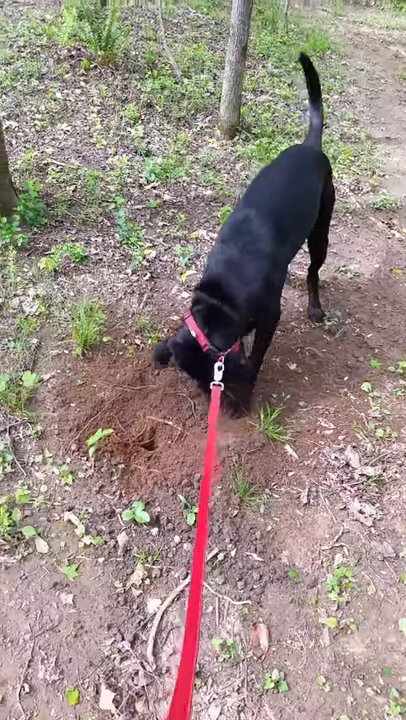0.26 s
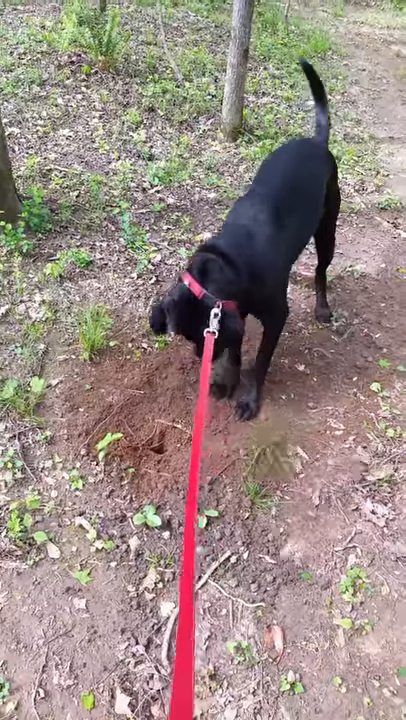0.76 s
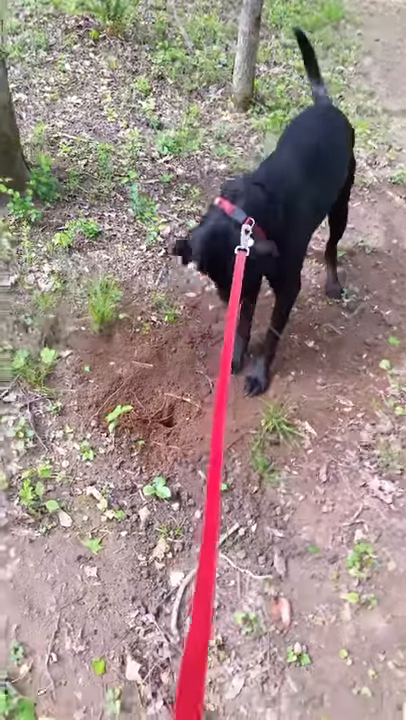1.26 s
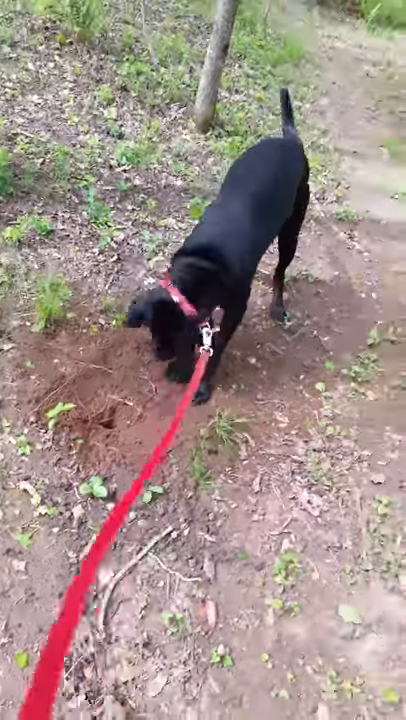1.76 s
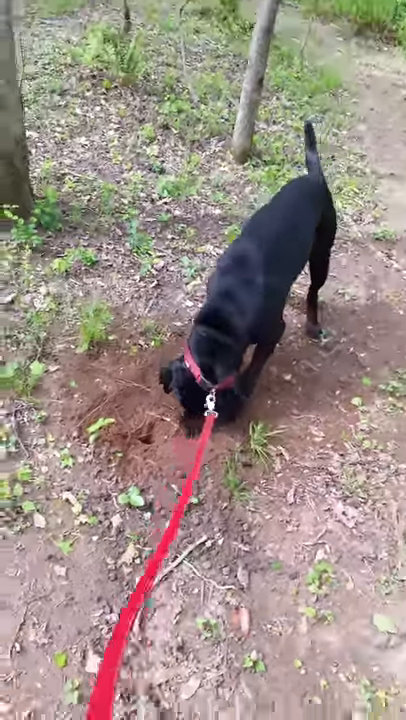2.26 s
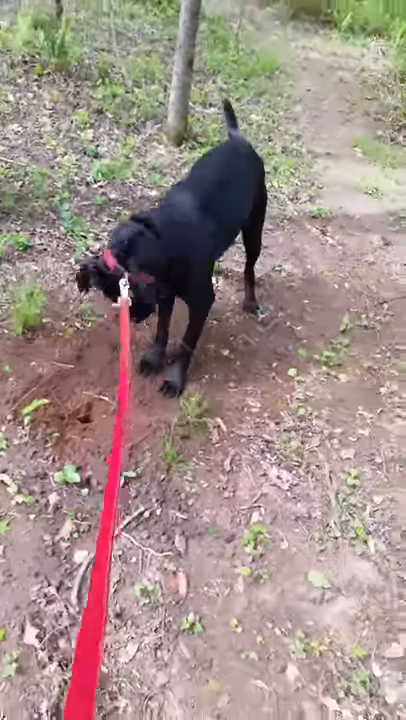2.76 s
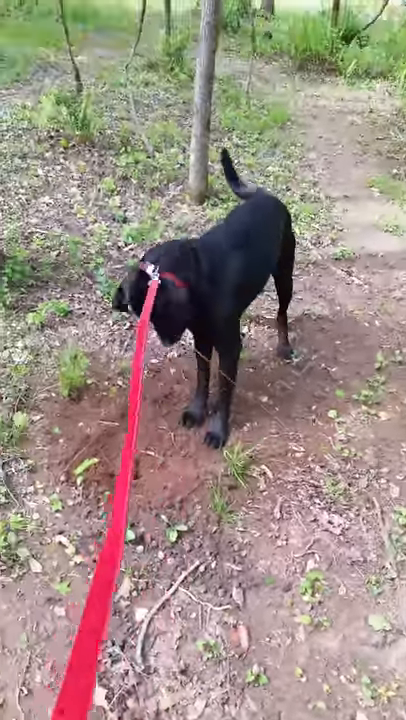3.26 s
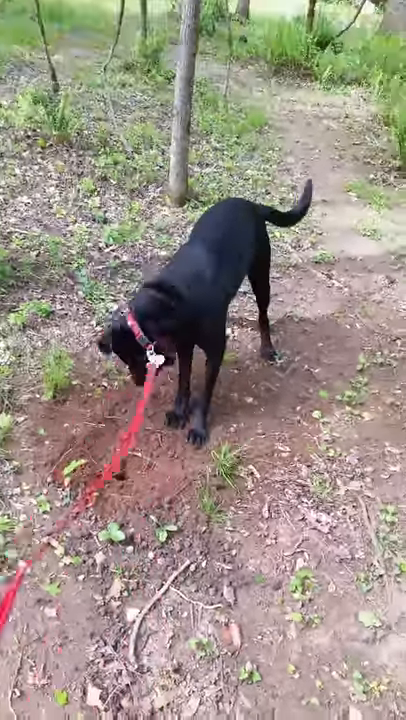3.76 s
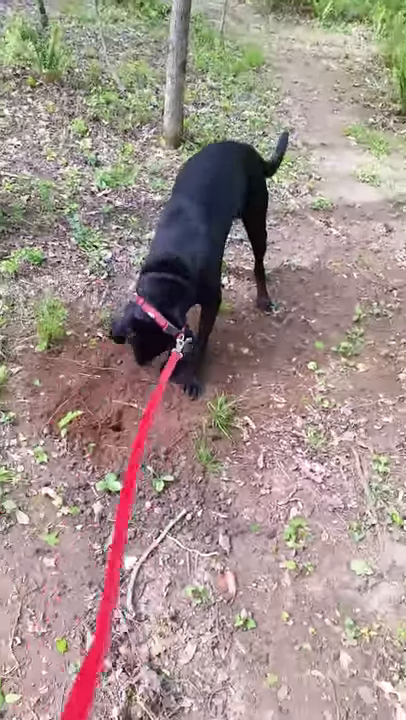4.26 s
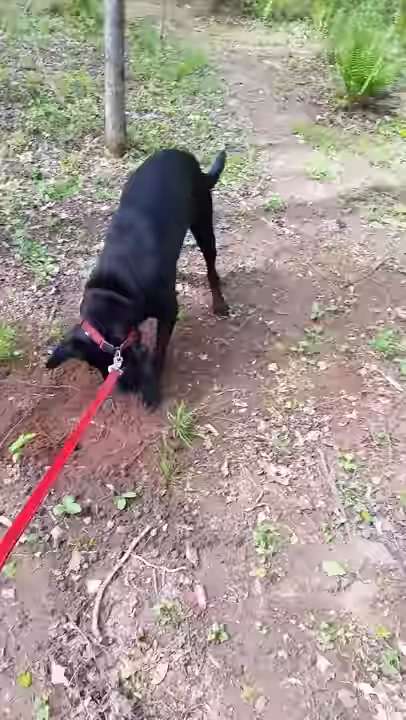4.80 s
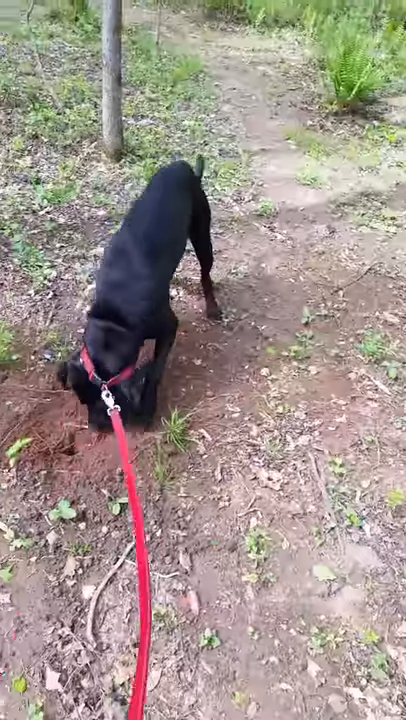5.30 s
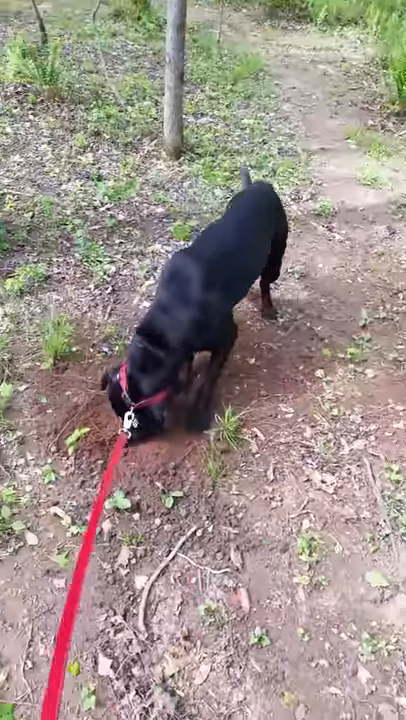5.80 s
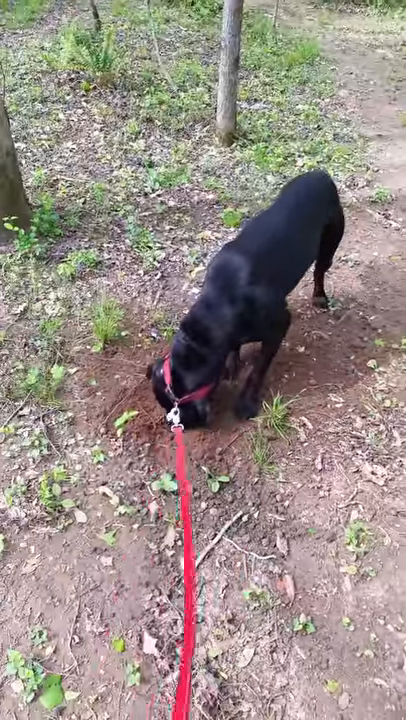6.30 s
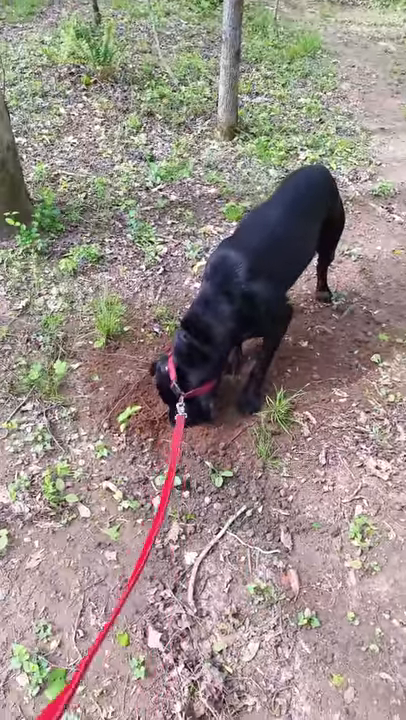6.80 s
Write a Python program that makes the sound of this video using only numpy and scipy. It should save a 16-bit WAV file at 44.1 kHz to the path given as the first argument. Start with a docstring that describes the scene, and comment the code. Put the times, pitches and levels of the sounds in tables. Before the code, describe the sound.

Faint outdoor hiss, a low rumble and a wavering hum run throughout on a woodland path. At about 0.5 seconds the microphone is softly bumped, and a dog starts pawing at dry soil. From 0.9 to 2 seconds its paws thud and scrape, grit hissing unevenly while clods and twigs snap sharply and a few pebbles tick. From 1.3 seconds the metal leash clip adds short, very high clinks. After a lull, a second bout of pawing comes between 3 and 4 seconds, with more thuds, crisp snaps and clinks, and a light rattle of the clasp. The scraping dies away by about 4.3 seconds. A few weak clinks follow until 5.3 seconds, then soft knocks near 5.6 and 6.7 seconds. A few very faint, brief whistles occur along the way, and the background carries on to the end at 7 seconds. The treble sounds brighter on the left.

```python
"""A leashed dog paws at dry soil on a woodland path. Faint hiss, a low rumble and a wavering hum sound
throughout, and the first of a few faint whistles follows. At 0.5 s the microphone is bumped; then paws thud,
grit scrapes by stick-slip friction, clods and twigs snap and pebbles tick. From 1.3 s the metal leash clip
rings in its modes; its clasp rattles in a second bout of pawing at 3-4 s. The scraping dies away, leaving a
few soft knocks. All is heard through two microphone ports, the left one resonating in the low treble."""
import sys
import numpy as np
from scipy import signal
from scipy.fft import rfft, irfft, next_fast_len
from scipy.io import wavfile
from scipy.ndimage import uniform_filter1d

SR = 44100
rng = np.random.default_rng(int(sys.argv[2]) if len(sys.argv) > 2 else 0)


def materialize(psi):
    """Save the field psi as 16-bit PCM at rate SR to the path in sys.argv[1].

    A 1-D psi becomes a single channel; in a 2-D psi each row is a channel.
    """
    bounded = np.clip(np.atleast_2d(psi).T, -1, 1)
    quanta = np.round(bounded * 32767).astype(np.int16)
    wavfile.write(sys.argv[1], SR, quanta)


N = 310816

# still air and far rumble: (frequency [Hz], spectral level [dB])
AIR_SPECTRUM = [(20, -27), (65, -11), (130, -13), (250, -25), (450, -31), (1080, -41), (2000, -52),
                (3300, -65), (3850, -53.5), (4600, -48.5), (5200, -60), (5800, -72.5), (7000, -78.5),
                (10000, -65), (15800, -52.5)]
# likeness of the air on the two sides: (frequency [Hz], correlation [1])
AIR_CORRELATION = [(60, 1), (240, 0.83), (950, 0.16), (3770, 0.01), (15000, 0.025)]
# swell of the rumble and of the hum: (time [s], level [dB])
RUMBLE_LEVEL = [(0.0, -57), (1.43, -49), (2.86, -53.5), (3.16, -47.5), (5.6, -57.5), (5.8, -68),
                (7.05, -58.5)]
HUM_LEVEL = [(0.0, -46), (0.53, -51), (0.61, -64), (1.71, -49.5), (3.59, -52), (4.91, -48), (5.16, -53.5),
             (5.38, -46.5), (7.05, -58)]
# colour of the rumble: (frequency [Hz], spectral level [dB])
RUMBLE_SPECTRUM = [(60, -2.5), (140, 3), (220, -4.5), (300, -1.5), (380, -14), (600, -16.5), (800, -20.5),
                   (1500, -36.5)]
# whistles: (time [s], duration [s], first pitch [Hz], target pitch [Hz], bandwidth [Hz], level [dB])
WHISTLE_GLIDES = [(0.243, 0.33, 2300, 2290, 320, -76.5), (1.466, 0.045, 874, 870, 120, -53),
                  (3.545, 0.085, 7200, 6800, 900, -62), (6.715, 0.3, 1232, 1580, 300, -76.5)]
# low thuds: a bump on the microphone at 0.5 s, then paws striking the ground:
# (time [s], level [dB], pitch [Hz])
LOW_THUDS = [(0.4955, -26.5, 125), (0.659, -38, 154), (0.9185, -19.5, 172), (0.9445, -21.5, 165),
             (1.254, -27.5, 268), (3.018, -26.5, 683), (3.053, -35.5, 730), (3.23, -22, 265),
             (3.245, -33, 563), (3.4875, -21.5, 543), (5.585, -38.5, 392), (5.764, -41, 253),
             (6.714, -43.5, 200)]
# clods and twigs breaking: (time [s], level [dB], relative level of the low part [dB])
LARGE_SNAPS = [(0.4968, -55, 5.5), (0.5161, -50.5, 5.5), (0.5681, -42.5, -2.5), (0.6639, -25.5, -12),
               (0.6754, -19.5, -20), (0.69, -32, -17), (0.9062, -15.5, -17), (0.9105, -16, -21),
               (0.9345, -22.5, -26), (1.037, -26.5, -17), (1.2532, -9.5, -20.5), (1.266, -18, -32),
               (1.3344, -23, -48), (1.3448, -21, -43.5), (1.3814, -18, -44.5), (1.4318, -27.5, -28),
               (1.4634, -24.5, -29), (1.7434, -26.5, -13), (1.749, -30, -11), (1.8208, -22.5, -32),
               (1.9084, -18, -39), (1.9665, -18.5, -35), (2.0672, -31.5, -26), (2.101, -27, -29.5),
               (2.3466, -37, -9), (2.4818, -45.5, -40), (3.0199, -39, 1.5), (3.0534, -39.5, -3.5),
               (3.2331, -17, -21), (3.2928, -30.5, -15), (3.3074, -20, -27), (3.3503, -31, -19.5),
               (3.4126, -28, -11), (3.473, -25, -28.5), (3.4905, -13.5, -14.5), (3.5085, -21, -24.5),
               (3.5144, -9, -27), (3.5339, -10.5, -27.5), (3.6065, -25.5, -30.5), (4.0941, -35, -45),
               (4.2642, -45, -18), (4.9072, -53.5, -11.5)]
# bright and low parts of a fracture: (frequency [Hz], gain [dB])
FRACTURE_BRIGHT = [(1500, -42), (2500, -31), (5000, -20.5), (9000, -6), (12000, 3), (15700, -7.5),
                   (16000, -39)]
FRACTURE_LOW = [(250, -8), (700, 4.5), (2000, 6), (4000, -3.5), (7000, -16.5), (10000, -49.5)]
# effort of the paws: (time [s], level [dB])
PAW_EFFORT = [(.5, -69), (.64, -61.5), (.88, -47.5), (1.08, -46), (1.45, -41.5), (1.78, -45.5),
              (1.88, -47.5), (2.0, -47.5), (2.13, -58), (2.3, -61.5), (2.72, -75), (2.77, -65.5),
              (3.08, -68), (3.2, -61), (3.4, -51), (3.62, -48), (4.15, -59), (4.3, -77.5), (6.3, -99)]
# fine grit and coarse crumbs: (frequency [Hz], gain [dB])
GRIT_SPECTRUM = [(1500, -55), (2200, -26), (3300, -8), (4300, -2), (7000, -3), (10000, 11), (14000, 10.5),
                 (15800, 10.5)]
SOIL_SPECTRUM = [(250, -6), (600, 0), (1200, -5.5), (2500, -6), (4000, -26.5), (6000, -37)]
# one band for each grain size, smaller grains higher: (frequency [Hz])
GRAIN_BANDS = [3034, 5280, 8370, 10700, 14670]
# pebbles knocking: (time [s], level [dB], pitch [Hz])
PEBBLE_TICKS = [(0.5267, -42.5, 2070), (1.5628, -36, 2940), (1.662, -43.5, 910), (3.772, -43.5, 980),
                (3.806, -48, 1250), (3.8375, -43, 4560), (4.845, -63.5, 4550), (5.2091, -58, 3890),
                (5.765, -60, 1005)]
# dry twigs and grit cracking: (time [s], level [dB])
TWIG_CRACKS = [(0.5515, -32), (0.9034, -13), (0.9184, 1.5), (0.9454, -3), (1.213, -13), (1.2638, -2),
               (1.4006, -13), (1.451, -12), (1.4893, -18), (1.628, -19), (1.6945, -25), (1.7095, -27),
               (1.8008, -27.5), (1.826, -21.5), (1.8412, -13), (1.863, -25.5), (2.0075, -30), (3.546, -13),
               (3.648, -26), (3.831, -34.5), (3.8383, -13.5), (3.868, -28), (3.912, -29.5), (4.351, -39),
               (4.683, -36)]
# blows on the leash clip, whose ring is short when it lies against the collar:
# (time [s], level [dB], relative level of the low modes [dB], T60 of the high modes [s])
CLIP_BLOWS = [(1.3234, -25, -30, 0.04), (1.345, -40, -30, 0.11), (1.3655, -33, -33, 0.04),
              (1.3743, -28, -35, 0.025), (1.6427, -28.5, -29, 0.035), (1.914, -21.5, -40, 0.073),
              (2.053, -57.5, 11.5, 0.03), (2.166, -38, -35, 0.022), (3.109, -32, -40, 0.014),
              (3.1268, -15.5, -34.5, 0.017), (3.152, -36, -32, 0.018), (3.1638, -21.5, -42, 0.018),
              (3.212, -44, -40, 0.019), (3.4224, -36, -30, 0.121), (3.452, -41, -17, 0.07),
              (3.4727, -34.5, -41.5, 0.027), (3.7112, -24.5, -45, 0.071), (3.751, -34.5, -20, 0.05),
              (3.85, -42.5, -18, 0.043), (4.0472, -36.5, -12, 0.045), (4.12, -43, -25, .03),
              (4.1348, -36.5, -31, 0.036), (4.695, -37.5, -36, 0.037), (5.1033, -50, -36, 0.068),
              (5.2884, -49.5, -48, 0.04)]
# high modes of the leash clip: (frequency [Hz], level [dB])
CLIP_HIGH_MODES = [(11760, 8), (11100, -11), (12250, -8), (11870, -7)]
# its low modes: (frequency [Hz], level [dB], T60 [s])
CLIP_LOW_MODES = [(8244, 4.5, 0.12), (7410, -2, 0.04)]
# touches of the clasp spring: (time [s], level [dB])
CLASP_TOUCHES = [(3.1083, -51), (3.1264, -49), (3.1595, -51), (3.172, -52.5), (3.3588, -54), (3.429, -58),
                 (3.445, -56), (3.5982, -52), (3.6093, -48), (3.717, -53)]
# modes of the clasp: (frequency [Hz], level [dB])
CLASP_MODES = [(2790, 2.5), (3130, 4), (3400, -2.5)]
# response of the left port relative to the right: (frequency [Hz], gain [dB])
PORT_RESPONSE = [(60, -2.5), (300, -2.5), (700, 0), (2600, 0), (3600, 9), (6000, 13), (7600, 9), (9200, 0),
                 (10500, -4), (15000, -2)]


def amp(db):
    return 10 ** (np.asarray(db) / 20)


def unit_rms(x):
    return x / np.sqrt(np.mean(x ** 2) + 1e-20)


def at_frequency(points, hz):
    """Interpolation of (frequency, value) points on a logarithmic frequency axis."""
    f, value = np.transpose(points)
    return np.interp(np.log(hz + 1), np.log(f + 1), value)


def contour(points):
    """Linear interpolation of (time, value) points at every sample."""
    return np.interp(np.arange(N) / SR, *np.transpose(points))


def colour(x, points):
    """Zero-phase filtering by (frequency, gain) points, silent outside their range."""
    size = next_fast_len(x.shape[-1])
    hz = np.fft.rfftfreq(size, 1 / SR)
    inside = (hz > points[0][0]) & (hz < points[-1][0])
    return irfft(rfft(x, size) * amp(at_frequency(points, hz)) * inside, size)[..., :x.shape[-1]]


def place(mix, start, sound, port_lag_s=0.00016):
    """Path difference: a sound reaches one port slightly before the other."""
    lags = port_lag_s * np.array([2 * rng.random(), 1])
    for side, lag, wave in zip(mix, lags, sound * np.ones((2, 1))):
        part = side[round((start + lag) * SR):][:len(wave)]
        part += wave[:len(part)]


def noise_pair(length, correlation):
    """Partial coherence: two white noises share a common part."""
    a, b = rng.standard_normal((2, length))
    return np.array([a, correlation * a + np.sqrt(1 - correlation ** 2) * b])


def air(patch_db=1.2, fade_from_s=4.6, fade_db_per_s=-2):
    """Diffuse noise, coherent in the bass; it drifts in patches below 3 kHz and fades late above."""
    frames, hz = N // 512 + 5, np.fft.rfftfreq(2048, 1 / SR)[:, None]
    a, b, c, d, patches = rng.standard_normal((frames, 1025, 5)).T
    patches = unit_rms(uniform_filter1d(uniform_filter1d(patches, 20, axis=0), 8, axis=1))
    correlation = at_frequency(AIR_CORRELATION, hz)
    left = a + 1j * b
    right = correlation * left + np.sqrt(1 - correlation ** 2) * (c + 1j * d)
    fade_db = fade_db_per_s * np.maximum(np.arange(frames) * 512 / SR - fade_from_s, 0)
    level_db = at_frequency(AIR_SPECTRUM, hz) + np.where(hz < 3000, patch_db * patches, fade_db)
    spectra = np.array([left, right]) * amp(level_db) * (hz < AIR_SPECTRUM[-1][0])
    return amp(-52.5) * unit_rms(signal.istft(spectra, nperseg=2048, noverlap=1536)[1][:, :N])


def rumble():
    """Slow amplitude modulation of low noise, largely coherent between the sides."""
    return amp(contour(RUMBLE_LEVEL)) * unit_rms(colour(noise_pair(N, 0.767), RUMBLE_SPECTRUM))


def hum(pitch_hz=96.5, half_width_hz=5.6):
    """Narrow-band noise: neighbouring frequencies beat, so the tone wavers."""
    hz = np.fft.rfftfreq(N, 1 / SR)
    peak = 1 / (1 + ((hz - pitch_hz) / half_width_hz) ** 2)
    tone = unit_rms(irfft(rfft(rng.standard_normal(N)) * peak, N))
    tone /= np.sqrt(0.072 + uniform_filter1d(tone ** 2, 4000))  # a steady source wavers less than noise
    return amp(contour(HUM_LEVEL)) * unit_rms(tone)


def whistles(glide_s=0.1):
    """Modulation of a gliding carrier by narrow-band noise gives a fuzzy whistle."""
    out = np.zeros((2, N))
    for start, duration, first_hz, target_hz, width_hz, db in WHISTLE_GLIDES:
        t = np.arange(0, duration, 1 / SR)
        pitch_hz = target_hz + (first_hz - target_hz) * np.exp(-t / glide_s)
        carrier = np.exp(2j * np.pi * np.cumsum(pitch_hz) / SR)
        pole = np.exp(-np.pi * width_hz / SR)
        noise = noise_pair(len(t), 1) + 1j * noise_pair(len(t), 1)
        fuzz = signal.lfilter([1], [1, -2 * pole, pole ** 2], noise)
        envelope = amp(db) * np.sin(np.pi * t / duration) ** 0.13
        place(out, start, envelope * unit_rms((fuzz * carrier).real))
    return out


def impacts(rows, t60, rise_s, puff_gain):
    """A damped oscillation follows each blow, with a puff of noise around its pitch."""
    out, t = np.zeros((2, N)), np.arange(6000) / SR
    for start, db, hz in rows:
        puff = unit_rms(colour(noise_pair(6000, .7), [(hz * .5, -12), (hz, 0), (hz * 1.2 + 600, -16)]))
        envelope = amp(db - 60 * t / t60) * np.minimum(t / rise_s, 1) ** 2
        place(out, start + rise_s / 2, envelope * (np.sin(2 * np.pi * hz * t) + puff_gain * puff))
    return out


def low_thuds():
    """Soft impact: a bump on the microphone, then paws on the ground, excite low damped vibrations."""
    return impacts(LOW_THUDS, t60=0.044, rise_s=0.0021, puff_gain=.35)


def fracture_spectrum(bright, low):
    """Superposition of the bright and low bands of a fracture."""
    return colour(bright, FRACTURE_BRIGHT) + colour(low, FRACTURE_LOW)


def small_snaps(count=50):
    """Rows of small fractures at random times, their level following the effort of the paws."""
    when, quantile = rng.random((count, 2)).T
    starts = PAW_EFFORT[0][0] + when * (PAW_EFFORT[-2][0] - PAW_EFFORT[0][0])
    levels = np.interp(starts, *np.transpose(PAW_EFFORT)) + 1.5 - np.log(quantile + .02)
    return [(start, db, -26) for start, db in zip(starts, levels)]


def snaps(rise_s=.0028, t60=0.015, scatter_t60=0.295):
    """Brittle fracture: a noise burst, then weak scatter. Such a click also opens each clink."""
    bright, low = np.zeros((2, 2, N))
    t = np.arange(4000) / SR
    clip_clicks = [(start - .001, db - 8, -26.5) for start, db, *_ in CLIP_BLOWS]
    for start, db, low_db in LARGE_SNAPS + clip_clicks + small_snaps():
        stretch = rng.uniform(.9, 1.4) * amp(0.12 * (db + 22))  # big clods break for longer
        decay = amp(-60 * np.maximum(t - rise_s, 0) / (t60 * stretch))
        scatter = amp(-17 - 0.11 * (db + 20.5) - 60 * t / scatter_t60)
        burst = amp(db) * np.minimum(t / rise_s, 1) ** 2 * (decay + scatter) * noise_pair(4000, 0.9)
        place(bright, start - rise_s / 2, burst)
        place(low, start - rise_s / 2, amp(low_db) * burst)
    return fracture_spectrum(bright, low)


def scraping(grains_per_band_s=90, grain_rise_s=.0012, grain_t60=.005, flutter_db=2):
    """Stick-slip friction: sliding soil hisses unevenly while separate grains collide at random."""
    t = np.arange(N) / SR
    moving = np.clip(np.minimum(t - PAW_EFFORT[0][0], PAW_EFFORT[-1][0] - t) / 0.03, 0, 1)
    flutter = amp(flutter_db * unit_rms(colour(rng.standard_normal(N), [(6, 4), (80, -9.5)])))
    grain = np.minimum(t[:800] / grain_rise_s, 1) * amp(-60 * t[:800] / grain_t60)
    grit = 0.59 * noise_pair(N, 0.12)
    for hz in GRAIN_BANDS:
        strength = amp(3 * np.minimum(rng.exponential(1, N), 3.5))  # a few grains are loud
        collisions = rng.random(N) < grains_per_band_s / SR
        bursts = signal.oaconvolve(strength * collisions, grain)[:N]
        band = [(hz * 0.84, -25), (hz * .8, 0), (hz * 1.25, 0), (hz * 1.9, -25)]
        grit += colour(0.35 * unit_rms(bursts) * noise_pair(N, 0.99), band)
    effort_db = contour(PAW_EFFORT)
    fine = amp(effort_db) * unit_rms(colour(grit, GRIT_SPECTRUM))
    # coarse crumbs follow the effort only in part, smoothed over 0.12 s
    soil_db = -62.5 + 0.55 * (uniform_filter1d(effort_db, round(0.12 * SR)) + 50)
    coarse = amp(soil_db) * unit_rms(colour(noise_pair(N, 0.0828), SOIL_SPECTRUM))
    return moving * flutter * (fine + coarse)


def pebble_ticks():
    """Hard impact: brief contact gives a high, quickly damped tick."""
    return impacts(PEBBLE_TICKS, t60=.014, rise_s=0.00081, puff_gain=1.3)


def cracks(rise_s=.0005, t60=.0035, low_db=-19):
    """Abrupt fracture of dry twigs and grit radiates a short broadband pulse."""
    bright, low = np.zeros((2, 2, N))
    t = np.arange(600) / SR
    for start, db in TWIG_CRACKS:
        burst = amp(db - 60 * t / t60) * np.minimum(t / rise_s, 1) * np.sign(noise_pair(600, 0.87))
        place(bright, start, burst)
        place(low, start, amp(low_db) * burst)
    return fracture_spectrum(bright, low)


def clip_clinks(detune=.003, linger_t60=0.2):
    """Beating: close modes of the struck metal clip interfere as they decay."""
    out, t = np.zeros((2, N)), np.arange(8000) / SR
    linger = amp(-36 - 60 * t / linger_t60)
    for start, db, low_db, high_t60 in CLIP_BLOWS:
        modes = [(hz, mode_db, high_t60) for hz, mode_db in CLIP_HIGH_MODES]
        modes += [(hz, mode_db + low_db, t60) for hz, mode_db, t60 in CLIP_LOW_MODES]
        phases = 2 * np.pi * rng.random(6)
        # each blow lands elsewhere and shifts the balance of the modes
        shifts_db = 4.3 * np.tanh(rng.standard_normal(6)) * (np.arange(6) > 0)
        ring = 0
        for (hz, mode_db, t60), phase, shift_db in zip(modes, phases, shifts_db):
            wave = np.sin(2 * np.pi * hz * (1 + detune * np.cos(phase)) * t + phase)
            ring += amp(mode_db + shift_db) * (amp(-60 * t / t60) + linger) * wave
        chatter = unit_rms(colour(rng.standard_normal(8000), [(15, -12), (250, -7)]))
        clink = ring * amp(3.5 * np.tanh(chatter))  # loose parts keep touching
        clink *= np.linalg.norm(ring) / np.linalg.norm(clink)
        place(out, start, amp(db) * np.minimum(t / .001, 1) * clink)
    return out


def clasp_rattles(ring_t60=.035, click_t60=.014):
    """Modal excitation: each touch of the spring mixes dull modes near 3 kHz anew, with a dry click."""
    out, t = np.zeros((2, N)), np.arange(4000) / SR
    for start, db in CLASP_TOUCHES:
        ring = 0
        for hz, mode_db in CLASP_MODES:
            cycle, shift_db = rng.random(), rng.uniform(-3, 3)
            ring += amp(mode_db + shift_db - 60 * t / ring_t60) * np.sin(2 * np.pi * (hz * t + cycle))
        noise = unit_rms(colour(noise_pair(4000, .7), [(1800, -10), (3000, 0), (5500, -12)]))
        click = 2.6 * amp(-60 * t / click_t60) * noise
        place(out, start, amp(db) * np.minimum(t / .0006, 1) * (ring + click))
    return out


def scene():
    """Linear superposition: the pressures of all sources add."""
    transients = snaps() + cracks() + clip_clinks() + low_thuds() + clasp_rattles() + pebble_ticks()
    return transients + scraping() + air() + rumble() + hum() + whistles()


def record(dry, cutoff_hz=16900):
    """Resonance of the left port colours its channel; a low-pass filter limits both."""
    size = next_fast_len(N + 4096)
    port = amp(at_frequency(PORT_RESPONSE, np.fft.rfftfreq(size, 1 / SR)))
    padded = np.pad(dry[0], (2048, size - N - 2048), "reflect")
    left = irfft(rfft(padded) * port, size)[2048:][:N]
    low_pass = signal.firwin(511, cutoff_hz, window=("kaiser", 9), fs=SR)
    return signal.oaconvolve(np.array([left, dry[1]]), low_pass[None], "same")


dry = scene()
out = record(dry)
materialize(out)
```